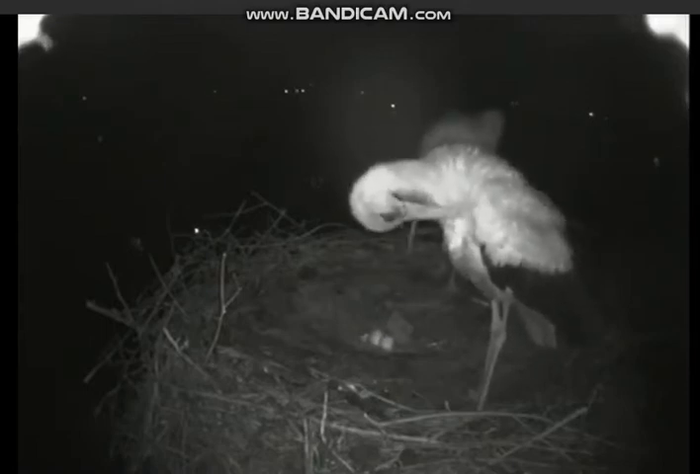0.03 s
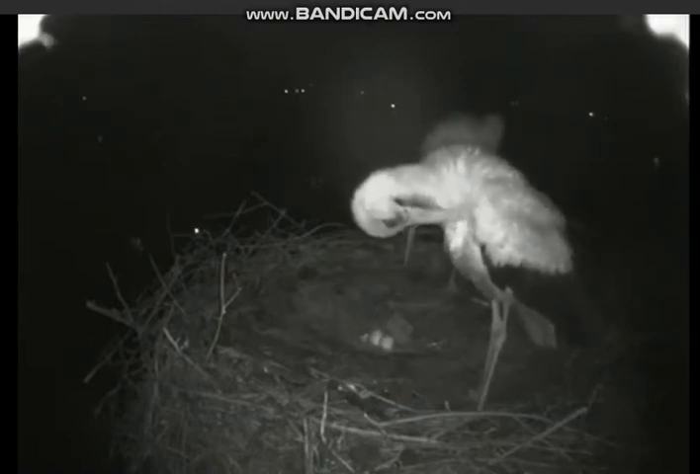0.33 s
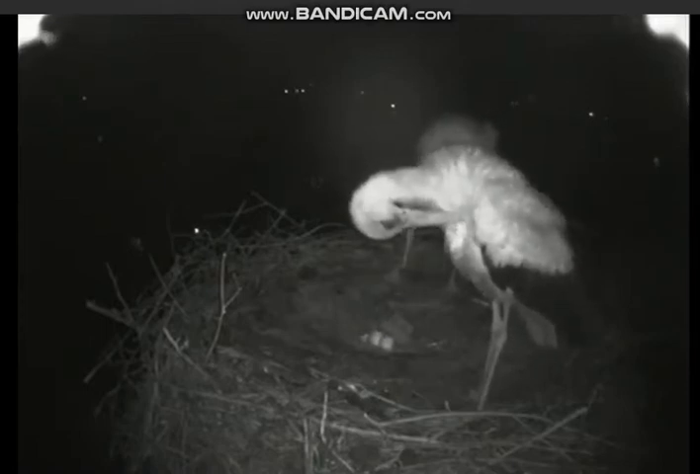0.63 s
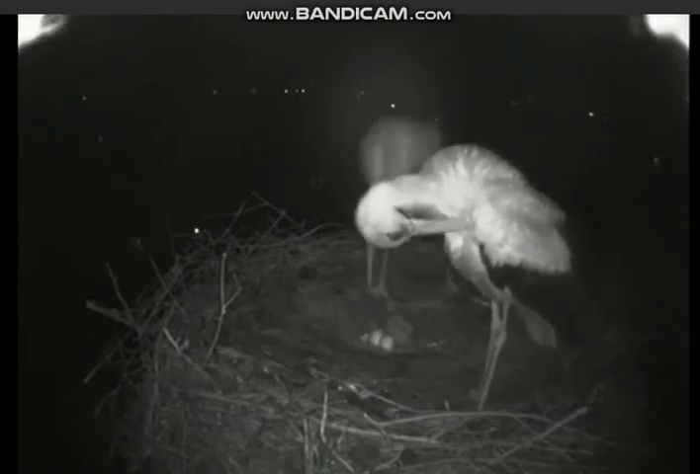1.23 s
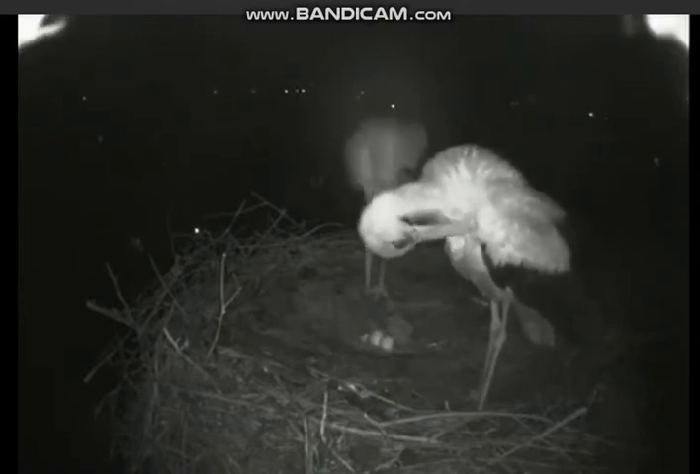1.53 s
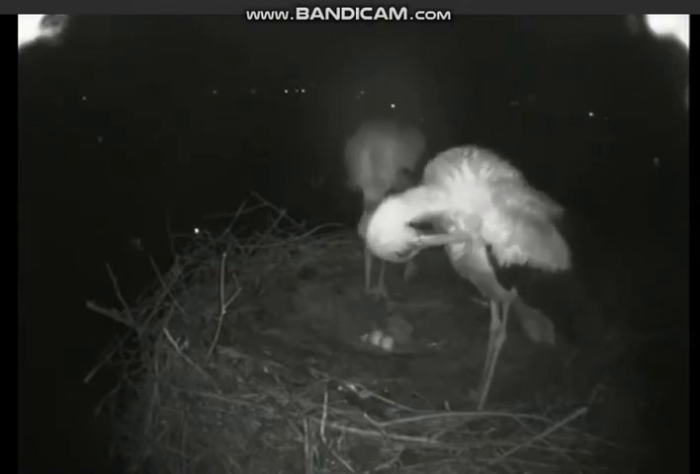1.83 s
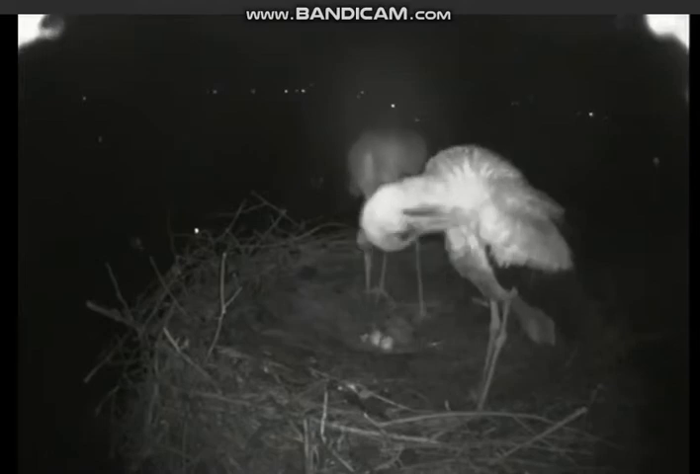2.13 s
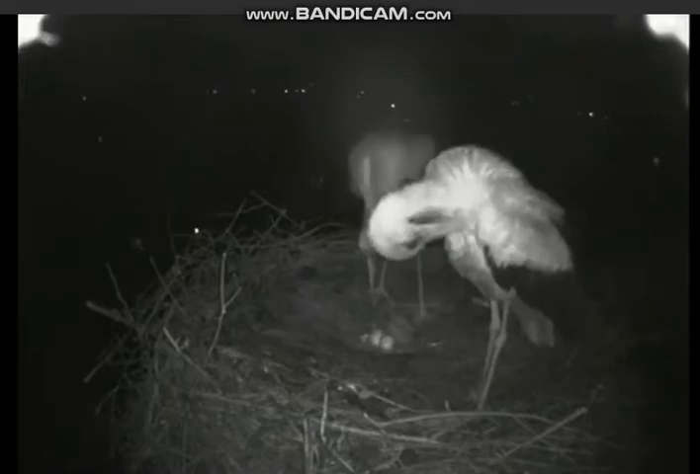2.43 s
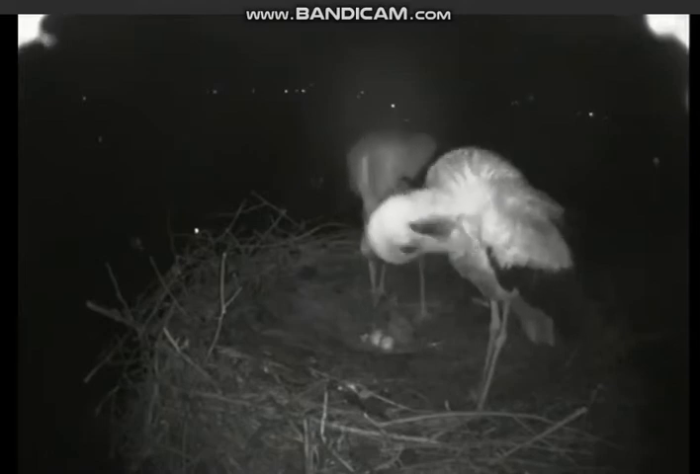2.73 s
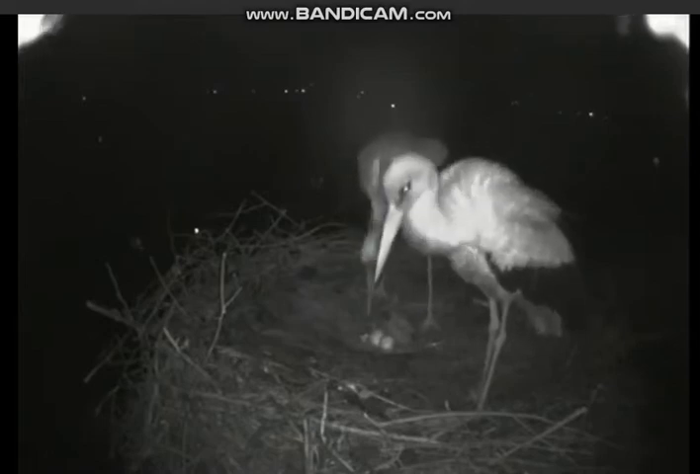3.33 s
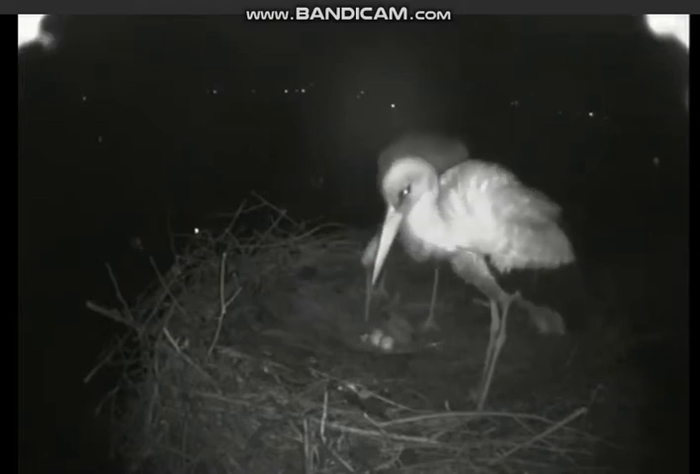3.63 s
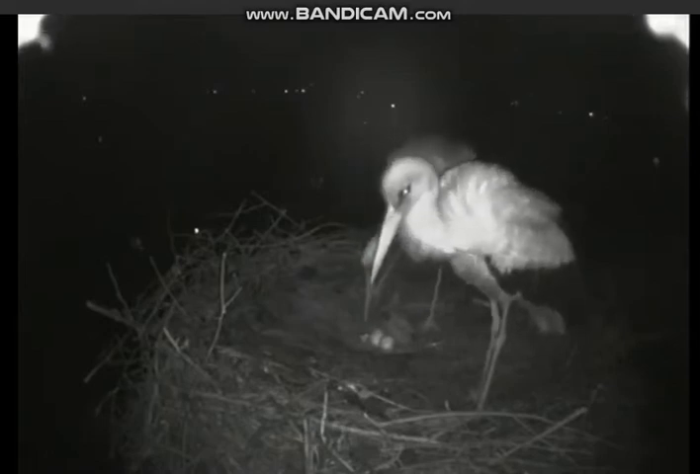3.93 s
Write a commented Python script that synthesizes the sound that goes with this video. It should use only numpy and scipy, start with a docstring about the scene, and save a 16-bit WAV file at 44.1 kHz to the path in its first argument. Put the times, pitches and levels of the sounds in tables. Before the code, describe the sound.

Storks give four short, hoarse squawks at about 1.9, 2.3, 2.6 and 2.9 seconds. Thin sliding squeaks are scattered throughout, with soft rattles near the start and around 3.5. Low wind rumble and faint hiss run underneath. Sharp clicks cut in at 0.5, 1, 2, 2.5 and 3.5, loudest at 1. Three dull bumps fall between 2.5 and 3, as a distant motor's faint hum climbs until the end.

```python
"""Night at a stork nest

A fixed camera's microphone hears rumbling wind, a steady hiss, a few dull bumps and a far motor's hum.
Birds give thin sliding squeaks, soft rattles and hoarse squawks. Rattles and squawks are quick pulses,
mostly slowing down, that ring a few resonances. The camera's sound skips now and then with a sharp click."""
import sys
import numpy as np
from scipy import signal
from scipy.io import wavfile
from scipy.ndimage import uniform_filter1d

SR = 44100
rng = np.random.default_rng(int(sys.argv[2]) if len(sys.argv) > 2 else 0)


def unload_wav(signal):
    """Save mono or channel-first audio to the path in sys.argv[1] as 16-bit WAV at rate SR, clipped to [-1, 1]."""
    wavfile.write(
        sys.argv[1],
        SR,
        np.round(np.clip(np.atleast_2d(signal).T, -1, 1) * 32767).astype(np.int16),
    )


N = 176400  # 4 seconds


def amp(db):
    """Turns decibels into a number to multiply a sound by."""
    return 10 ** (np.asarray(db) / 20)


def unit(x):
    """Scales a signal so its average strength (rms) is one."""
    return x / np.sqrt(np.mean(x ** 2) + 1e-20)


def level_at(colour, hz):
    """Looks up the dB at a frequency in a tone colour table; above its last row is near silence."""
    f, db = np.transpose(colour)
    return np.interp(np.log(hz + 1), np.log(f + 1), db, right=-100)


def add(mix, start, sound):
    """Mixes a sound in at a start time in seconds."""
    part = mix[max(round(start * SR), 0):][:len(sound)]
    part += sound[:len(part)]


def noise(colour, drift_db, size):
    """Noise with a given tone colour, in which patches drift louder and softer."""
    hz = np.fft.rfftfreq(size, 1 / SR)
    real, imag, drift = rng.standard_normal((3, N * 4 // size + 5, len(hz)))
    drift = uniform_filter1d(drift, size=8, axis=0)  # smooth over time
    drift = unit(uniform_filter1d(drift, size=12, axis=1))  # and over frequency
    spectra = (real + 1j * imag) * amp(level_at(colour, hz) + drift_db * drift)
    _, sound = signal.istft(spectra.T, nperseg=size, noverlap=size - size // 4)
    return unit(sound[:N])


def resonate(x, hz, width_hz):
    """A resonance: makes a sound ring in a band around a frequency that may move."""
    turn = np.exp(2j * np.pi * np.cumsum(hz) / SR)
    decay = np.exp(-np.pi * width_hz * np.e / SR)
    band = x / turn  # shift the band down to 0 Hz, smooth it, then shift it back
    for _ in range(6):
        band = signal.lfilter([1 - decay], [1, -decay], band)
    return 2 * (turn * band).real


# Tone colour of the wind's deep and upper rumble: f/Hz, relative level/dB
DEEP_COLOUR = [(8.8, -32), (15, -1), (43, 3.5), (100, -13), (130, -41), (220, -120)]
UPPER_COLOUR = [(60, -20.5), (95, 4), (135, -4.5), (200, -10), (300, -18.5), (450, -27), (800, -51),
                (2000, -57)]
# How loud each rumble is over time: t/s, level/dB
DEEP_LEVELS = [(0.0, -24), (0.27, -28.5), (0.5, -32), (0.81, -18), (0.9, -28.5), (1.85, -28.5),
               (2.0, -33.5), (2.03, -27), (2.42, -42), (2.44, -27), (2.62, -31.5), (2.72, -24.5),
               (2.82, -34), (3.13, -25.5), (3.27, -37.5), (3.34, -25.5), (3.38, -30.5), (4.0, -25.5)]
UPPER_LEVELS = [(0.0, -34), (0.51, -40), (1.04, -32.5), (1.05, -37), (2.47, -44.5), (2.52, -38.5),
                (2.64, -43), (2.73, -39.5), (2.84, -47), (3.0, -36), (3.22, -45), (4.0, -40)]
def wind():
    """Wind swells and drops in two bands of low noise."""
    t = np.arange(N) / SR
    deep = amp(np.interp(t, *np.transpose(DEEP_LEVELS))) * noise(DEEP_COLOUR, drift_db=0, size=8192)
    upper = amp(np.interp(t, *np.transpose(UPPER_LEVELS))) * noise(UPPER_COLOUR, drift_db=1.5, size=2048)
    return deep + upper


# Tone colour of the hiss: f/Hz, relative level/dB
HISS_COLOUR = [(200, -2), (500, 2.5), (900, 5.5), (1300, 2), (1850, 0.5), (2500, -9), (3500, -12.5),
               (6000, -16.5), (9600, -18.5), (10300, -48.5)]
def hiss():
    """A faint, steady noise lies behind everything."""
    return amp(-55.5) * noise(HISS_COLOUR, drift_db=1.3, size=1024)


def rasp(length, first_rate, last_rate, rough, resonances):
    """A bird's uneven pulses ring sinking resonances, the high ones least evenly, as its effort fades."""
    t = np.arange(int((length + .004) * SR)) / SR  # a little extra time to ring out
    progress = np.minimum(t / length, 1)
    rate = first_rate + (last_rate - first_rate) * progress ** 2.4
    # Each pulse comes a bit early or late, and a bit louder or softer.
    slips, sizes, *scatters = np.clip(rng.standard_normal((2 + len(resonances), 64)), -1.7, 1.7)
    pulse_at = np.searchsorted(np.cumsum(rate) / SR, np.arange(len(slips)) + .5 + .35 * rough * slips)
    in_call = pulse_at < length * SR
    breath = .7 * rough * rng.standard_normal(N)[:len(t)] * (t < length)
    ending = np.maximum(1 - (1 - progress) / .38, 0)  # 0 to 1 over the last 38% of the call
    effort = np.minimum(t / .006, 1) * amp(-13 * ending)
    sag = 1 + .024 * (1 - 2 * progress)
    out = 0
    for (hz, width_hz, db), scatter in zip(resonances, scatters):
        strengths = amp(4 * rough * sizes + .0005 * hz * scatter)
        pulses = np.bincount(pulse_at[in_call], strengths[in_call], len(t))
        voice = (unit(pulses) + breath) * effort
        out = out + amp(db) * unit(resonate(voice, hz * sag, width_hz))
    return unit(out)


# Soft rattles: t/s, length/s, level/dB, low resonance f/Hz, high resonance f/Hz, high over low/dB
RATTLE_CALLS = [(0.086, 0.048, -62.5, 2600, 4500, 1.5), (0.181, 0.06, -62, 4770, 9000, -2.5),
                (0.588, 0.015, -63, 2970, 4500, 5), (3.359, 0.038, -54.5, 1920, 4900, -7.5),
                (3.460, 0.033, -60.5, 4460, 6500, -2), (3.581, 0.04, -64, 4260, 5200, 4),
                (3.645, 0.04, -61, 4400, 5360, 1)]
def rattles():
    """A bird rattles softly: slowing pulses ring two resonances."""
    out = np.zeros(N)
    for start, length, db, low_hz, high_hz, high_db in RATTLE_CALLS:
        resonances = [(low_hz, 750, 0), (high_hz, 750, high_db)]  # both 750 Hz wide
        call = rasp(length, first_rate=190, last_rate=160, rough=.4, resonances=resonances)
        add(out, start, amp(db) * call)
    return out


# Tone colour the throat gives a squeak: f/Hz, relative level/dB
THROAT_COLOUR = [(900, -32), (1500, -2), (2100, 2.5), (3000, -0.5), (4400, -4.5), (6000, -9.5), (7200, -8),
                 (9000, -4), (10500, -33)]
# Thin squeaks: t/s, length/s, level/dB, first f/Hz, last f/Hz, overtones before the throat/dB
SQUEAK_CALLS = [ (0.153, 0.068, -52, 3450, 1352, -3.5), (0.765, 0.025, -60, 2790, 3180, -9),
                (0.781, 0.03, -60.5, 1720, 3000, -9), (0.838, 0.057, -55, 3240, 1274, -5),
                (1.403, 0.013, -55.5, 2700, 3500, -25), (1.46, 0.052, -57.5, 3320, 1430, 0),
                (1.482, 0.058, -56.5, 3250, 1385, -1), (2.422, 0.063, -59, 2990, 1253, -1),
                (2.580, 0.042, -59.5, 2380, 2900, -18), (2.61, 0.0128, -46, 2810, 2090, -18),
                (2.916, 0.019, -55.5, 2070, 2380, -21), (2.935, 0.0089, -48, 2374, 2080, -28),
                (3.26, 0.023, -63, 1730, 3000, 0), (3.302, 0.05, -56, 1533, 1320, -22),
                (3.327, 0.05, -52, 3034, 1320, 0)]
def squeaks():
    """A bird's scratchy, breathy tone slides quickly in pitch, then levels off."""
    out = np.zeros(N)
    breath = noise(THROAT_COLOUR, drift_db=0, size=512)
    for start, length, db, first_hz, last_hz, overtones_db in SQUEAK_CALLS:
        progress = np.linspace(0, 1, int(length * SR))
        wobbles = unit(uniform_filter1d(rng.standard_normal((2, SR // 10)), int(.001 * SR)))
        waver, flutter = wobbles[:, :len(progress)]  # one for pitch, one for loudness
        slide_hz = last_hz * (first_hz / last_hz) ** ((1 - progress) ** 1.5)
        hz = slide_hz * (1 + .03 * waver)
        phase = 2 * np.pi * np.cumsum(hz) / SR
        tone = 0
        for k in range(1, 8):  # the main tone and six ever weaker overtones
            voice_db = 0 if k == 1 else overtones_db - 4.5 * (k - 2)
            tone = tone + amp(voice_db + level_at(THROAT_COLOUR, k * hz)) * np.cos(k * phase)
        air = amp(-10.5 + overtones_db / 2) * breath[int(start * SR):][:len(progress)]
        fade = np.minimum(np.minimum(progress, 1 - progress) / .13, 1)
        call = (unit(tone) + air) * fade * amp(3.5 * flutter)
        add(out, start, amp(db) * unit(call))
    return out


# Skips in the camera's sound: t/s, gap length/s (0 is just a click), level of each jump/dB
FEED_SKIPS = [(.5165, .0113, -28), (1.0241, 0, -17), (2.0053, .0074, -29), (2.509, 0, -30),
              (3.5165, .0113, -41)]
def skips(sound):
    """The sound feed dips for a moment, and the wave jumps at each edge of the gap with a click."""
    t = np.arange(N) / SR
    click_decay_s, edge_s, gap_db = .004, .0011, -20.5
    for start, gap, db in FEED_SKIPS:
        from_gap_s = np.maximum(start - t, t - start - gap)  # negative inside the gap
        side = np.where(t < start, 1, -1) * (from_gap_s >= 0)
        click = side * np.exp(-abs(from_gap_s) / click_decay_s)
        dip = np.clip(from_gap_s / edge_s, amp(gap_db), 1) if gap else 1
        sound = sound * dip + amp(db) * click
    return sound


# Hoarse squawks: t/s, length/s, level/dB, first pulse rate/Hz, last pulse rate/Hz, roughness (0 to 1),
# four resonances, each as (f/Hz, width/Hz, relative level/dB)
SQUAWK_CALLS = [ (1.92, 0.038, -50.5, 613, 410, 0.84, [(1790, 1700, 1.5), (3800, 610, -7), (5170, 1300, 0),
                (6800, 1760, 1.5)]), (1.942, 0.039, -47.5, 633, 396, 0.47, [(2620, 1700, -0.5),
                (3770, 180, 4.5), (4700, 730, 2.5), (6650, 1100, 0.5)]),
                (1.976, 0.06, -48.5, 429, 388, 0.62, [(1950, 650, -1), (3700, 460, -1), (4700, 940, 1.5),
                (6860, 1900, -9.5)]), (2.012, .068, -49.5, 399.4, 228, 0.27, [(1610, 1020, 2.5),
                (3870, 800, 1), (4530, 620, 2), (6900, 2100, -11.5)]),
                (2.331, 0.045, -48, 400, 376, 0.72, [(1900, 560, -5.5), (2900, 530, -9), (3720, 750, -6),
                (4700, 1260, -11.5)]), (2.358, 0.04, -47.5, 371, 340, 0.29, [(1870, 510, 1),
                (3030, 330, -2), (3640, 1100, -7), (4850, 770, -11)]),
                (2.382, 0.04, -51, 335, 204, 0.16, [(1780, 550, -2), (2880, 400, -3.5), (3700, 1200, -12),
                (4600, 590, -15)]), (2.615, 0.043, -50.5, 480.5, 318, 0.745, [(2020, 840, 3.5),
                (2780, 530, -4), (5400, 2900, -7.5), (7300, 2400, -19)]),
                (2.639, 0.083, -49, 322.4, 171, .28, [(1860, 640, 0.5), (2520, 470, 1), (5500, 730, -11),
                (7240, 1800, -10.5)]), (2.928, 0.057, -50, 330, 453, .7, [(2140, 340, 4.5),
                (4000, 640, -20), (5200, 1300, -4), (7000, 1700, -12)]),
                (2.958, 0.065, -48, 313, 177.5, 0.092, [(2110, 240, 1), (3920, 410, -17),
                (5400, 1100, -7.5), (7300, 1400, -16)])]
def squawks():
    """A bird squawks: pulses, faster and louder than in a rattle, ring four resonances."""
    out = np.zeros(N)
    for start, length, db, first_rate, last_rate, rough, resonances in SQUAWK_CALLS:
        add(out, start, amp(db) * rasp(length, first_rate, last_rate, rough, resonances))
    return out


# Pitch and loudness of the motor's hum: t/s, f/Hz, level/dB
MOTOR_HUM = [(2.099, 190, -72), (2.851, 213, -54), (3.401, 235, -58), (3.65, 244, -52.5), (4.0, 260, -66.5)]
def motor():
    """A far motor slowly gathers speed, so its clean, slightly wavering hum climbs in pitch."""
    t = np.arange(N) / SR
    times, hz, db = np.transpose(MOTOR_HUM)
    waver_hz = 2.5 * unit(uniform_filter1d(rng.standard_normal(N), int(.06 * SR)))
    cycles = np.cumsum(np.interp(t, times, hz) + waver_hz) / SR
    return np.interp(t, times, amp(db), left=0) * unit(np.sin(2 * np.pi * cycles))


# Dull bumps: t/s, length/s, level/dB, f/Hz
LOW_BUMPS = [(2.52, 0.045, -45, 171), (2.69, 0.069, -37, 138), (2.96, 0.069, -44, 111)]
def bumps():
    """Each bump is a narrow band of low noise that quickly swells and fades."""
    out = np.zeros(N)
    run_in = SR // 10  # samples for the resonance to settle
    for start, length, db, centre_hz in LOW_BUMPS:
        progress = np.linspace(0, 1, int(length * SR))
        hz = np.full(run_in + len(progress), centre_hz)
        band = resonate(rng.standard_normal(N)[:len(hz)], hz, width_hz=42)[run_in:]
        swell = np.sqrt(progress * (1 - progress))
        add(out, start, amp(db) * unit(band * swell))
    return out


def scene():
    """Mixes the night air, birds, motor and bumps into one channel."""
    return (wind() + hiss() + rattles() + squeaks() + squawks() + motor() + bumps())[None]


def record(dry):
    """Fades both ends, adds the camera's skips and cuts the treble above 10300 Hz."""
    t = np.arange(N) / SR
    fade = np.minimum(np.minimum(t, t[::-1]) / .004, 1)
    feed = skips(dry[0] * fade)
    treble_cut = signal.firwin(255, 10300, window=("kaiser", 8), fs=SR)
    return signal.oaconvolve(feed, treble_cut, "same")[None]


dry = scene()
out = record(dry)
unload_wav(out)
```